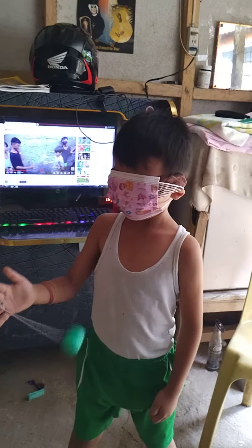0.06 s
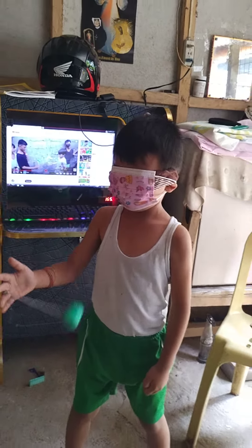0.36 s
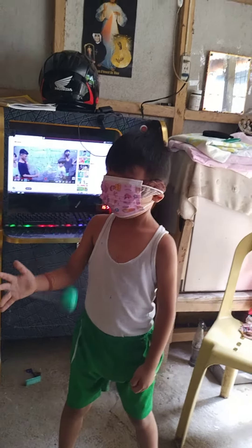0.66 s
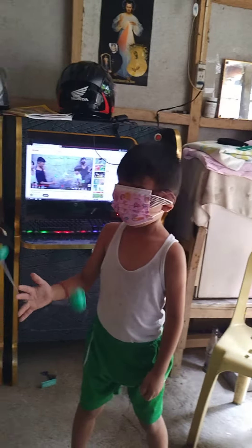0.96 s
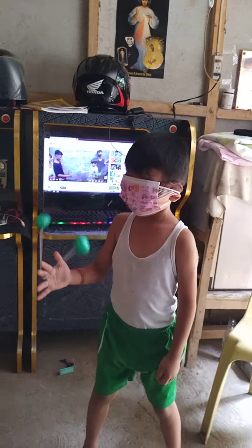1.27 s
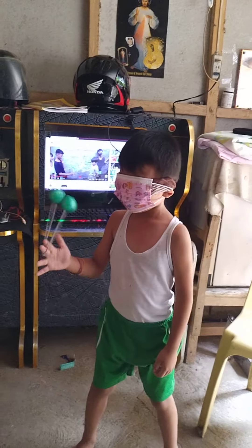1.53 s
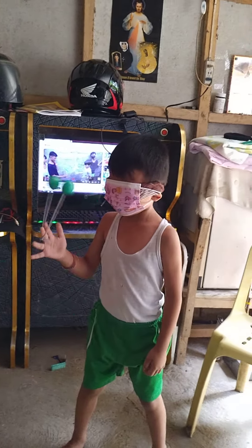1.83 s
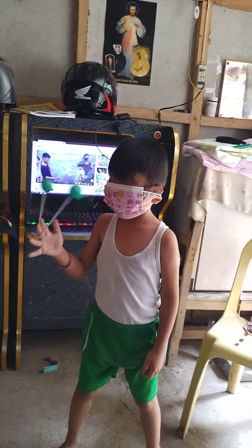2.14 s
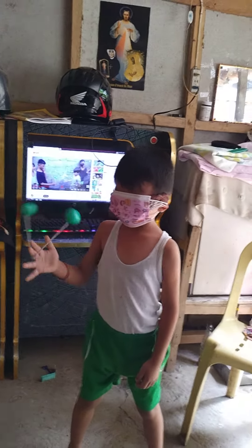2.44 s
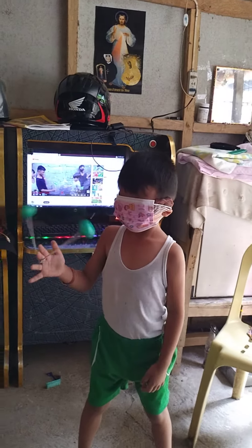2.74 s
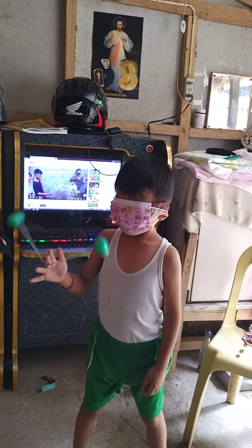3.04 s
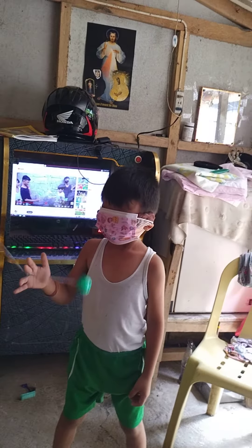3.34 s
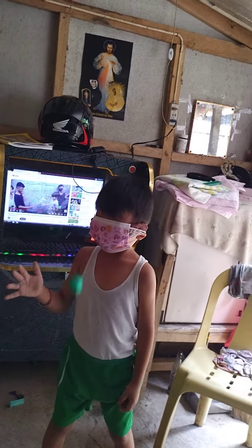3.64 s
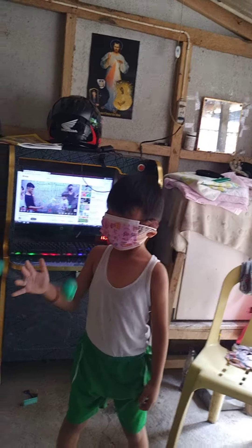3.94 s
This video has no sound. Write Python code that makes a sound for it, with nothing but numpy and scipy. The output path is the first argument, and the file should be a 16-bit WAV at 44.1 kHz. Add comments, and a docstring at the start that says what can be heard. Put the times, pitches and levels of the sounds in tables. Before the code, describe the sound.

Two hard plastic balls on strings clack together in a fast, even rhythm indoors.

```python
"""A small room in a house. Two hard plastic balls on strings clack together about 6.5 times a second,
in turn above and below the hand. Each contact is one very short pressure pulse that hardly rings;
near surfaces and the room give it body. The hardest clacks overload the microphone, adding a dull thump.
Underneath: faint room noise, weak hums and a few far-off whistling tones."""
import sys
import numpy as np
from scipy import signal
from scipy.fft import rfft, irfft, next_fast_len
from scipy.io import wavfile
from scipy.ndimage import map_coordinates

SR = 44100
rng = np.random.default_rng(int(sys.argv[2]) if len(sys.argv) > 2 else 0)


def file_out(sig):
    """Save sig as 16-bit WAV at sys.argv[1]."""
    # one column per channel
    cols = np.atleast_2d(sig).T
    # limit, then scale
    lim = np.clip(cols, -1, 1)
    pcm = np.round(lim * 32767).astype(np.int16)
    wavfile.write(sys.argv[1], SR, pcm)


N = 176400

# Ball contacts. Each row: start in seconds, left direct peak in dB, room send in dB, place (0 above the
# hand, 1 below), notch in Hz (higher for a harder, shorter contact), treble in dB, ping in dB.
CONTACTS = [(0.0275, -3.5, 7.4, 0, 8700, -1.7, 4), (0.1803, -2, 11.5, 1, 8900, -2, 4.5),
            (0.3435, -10, 8.4, 0, 8900, 0.64, 1.5), (.4920, -4.5, 11.3, 1, 9400, -1.6, 4),
            (0.6592, -8, 6.2, 0, 8200, -3.7, 8), (.8119, 1, 11.8, 1, 10600, 1, 2.5),
            (0.9717, -0.5, 8.6, 0, 10500, 1, 0.5), (1.1186, 3.5, 13.2, 1, 10900, 1, 4),
            (1.297, 1.5, 7.3, 0, 10270, -1.6, 3), (1.447, 8, 12.6, 1, 11150, -0.59, 6.5),
            (1.5970, 4, 8.4, 0, 10560, -0.37, 4), (1.7406, 6, 12.2, 1, 10330, -0.16, 6.5),
            (1.8966, 0.2, 8.1, 0, 10350, 0, 0.5), (2.0439, 7, 11.7, 1, 10600, -2.1, 7.5),
            (2.217, 0, 6.3, 0, 9400, -2.8, 4.5), (2.3718, 7.5, 12.3, 1, 10600, -2.6, 9),
            (2.5270, 0.5, 7, 0, 8900, -4.3, 3.5), (2.6687, 4, 11.2, 1, 9970, 1, 6),
            (2.8328, -1.4, 8.1, 0, 9500, 0.13, 3), (2.98, 0, 12.4, 1, 11200, 1, 5),
            (3.1469, -6, 8, 0, 9700, -0.23, 3), (3.2998, -4.5, 10.8, 1, 10900, -0.84, 1),
            (3.4630, -5.8, 7.6, 0, 8950, -1.8, 2), (3.6037, 1.8, 11.7, 1, 10650, 0.081, 1.5),
            (3.7677, -0.7, 6.7, 0, 10200, -0.31, 2.5), (3.9182, 6.5, 12.7, 1, 11100, 0.82, 4)]
# Spectra of the contact pulse and of the room's answer per place. Each row: frequency in Hz, gain in dB.
PULSE_SPECTRUM = [(100, -31), (700, -40.5), (1400, -18.5), (2800, -6), (4500, -1), (6500, -3.5),
                  (9000, -9.5), (12500, -7.5), (15000, -24), (16500, -23.5), (20000, -67)]
ROOM_SPECTRUM_ABOVE = [(100, -41.5), (500, -33.5), (900, -23), (1500, -17.5), (2300, -7), (3300, -3.5),
                       (4800, -1), (7000, -7.5), (10000, -6.5), (13400, -8.5), (14800, -38), (16500, -27)]
ROOM_SPECTRUM_BELOW = [(100, -35), (500, -29.5), (900, -24.5), (1500, -13), (2300, -6), (3500, 0.5),
                       (5000, 1.5), (7000, -2), (9500, -4), (13400, -3.5), (15000, -25), (16500, -40)]
# Stereo image per place. Each row: direct left over right in dB, right lag in ms,
# room left over right in dB.
STEREO_PLACES = [(2.3, -.035, 1.1), (3.2, 0.13, 1.04)]
# Near-surface echoes, one list per place. Each row: delay in ms, level in dB re the direct pulse.
REFLECTIONS = [
    [(.8, -12), (2.6, -18), (3.4, -9.5), (5.5, -10.5)],
    [(1.0, -18.5), (2.4, -11), (4.5, -24), (5.4, -21.5)],
]
# Room decay. Each row: frequency in Hz, T60 in seconds.
ROOM_DECAY = [(300, 0.13), (1500, 0.12), (4000, 0.13), (8000, 0.12), (14000, 0.13)]
# Room noise. Each row: frequency in Hz, relative level in dB.
HUSH_SPECTRUM = [(20, 11), (40, 9), (70, 6), (170, 7.5), (290, -3.5), (430, -7.5), (734, -9), (2480, -12),
                 (5000, -9.5), (8600, -14), (13000, -20.5), (15000, -38)]
# Room noise width. Each row: frequency in Hz, left-right correlation.
HUSH_CORRELATION = [(100, 0.88), (400, 0.77), (1500, 0.13), (6000, 0.16)]
# Far whistles. Each row: start in seconds, length in seconds, pitch in Hz, peak in dB.
WHISTLES = [(.56, 0.15, 1060, -70), (.90, .08, 1150, -72), (3.678, 0.08, 1800, -64),
            (3.714, .16, 1315, -58), (3.96, .12, 775, -58)]
# Narrow noise bands. Each row: centre in Hz, width in Hz, mean level in dB.
HUM_BANDS = [(200.3, 10, -71.5), (362, 20, -75.5), (494, 25, -80), (1393, 63, -86.5)]

HIT_SAMPLES = 16384
NOTCH_DB, NOTCH_WIDTH_HZ = -8.5, 1090
PING_HZ, PING_WIDTH_HZ, TREBLE_CORNER_HZ = 10180, 1500, 7000
REFLECTION_SCATTER_MS, ROOM_BUILD_MS, ROOM_TRIM_DB = 0.1307, 2.61, -0.56
HOUSE_DB, HOUSE_T60_S = -30.5, 0.38  # slower decay beyond the room
WHISTLE_WAVER, WHISTLE_RISE_PER_S = 0.0073, 0.27  # fractions of the pitch
HUSH_DB, HUSH_LEFT_DB, HUSH_WAVER_DB, HUSH_WAVER_PER_S = -60.5, 1, 1.9, 7
CLIP_LEVEL, BAND_LIMIT_HZ = 0.94, 16000


def clacking_balls():
    """Each contact pulse arrives directly, off near surfaces and through the room."""
    out = np.zeros((2, N + 2 * HIT_SAMPLES))
    base_spectrum = minimum_phase(PULSE_SPECTRUM)
    room_colours = [minimum_phase(ROOM_SPECTRUM_ABOVE), minimum_phase(ROOM_SPECTRUM_BELOW)]
    kept_samples = HIT_SAMPLES // 2
    for start_s, direct_db, send_db, place, notch_hz, treble_db, ping_db in CONTACTS:
        left_db, lag_ms, room_left_db = STEREO_PLACES[place]
        colour = contact_colour(notch_hz, treble_db, ping_db)
        pulse = base_spectrum * colour
        pulse /= np.abs(irfft(pulse)).max()
        direct = amp([[0], [-left_db]]) * delay([max(-lag_ms, 0), max(lag_ms, 0)])
        early = sum(amp(db) * delay(ms + REFLECTION_SCATTER_MS * rng.standard_normal(2))
                    for ms, db in REFLECTIONS[place])
        room = amp(send_db + ROOM_TRIM_DB) * pan(room_left_db) * room_tail(room_colours[place] * colour)
        clack = amp(direct_db) * irfft(pulse * (direct + early)) + room
        onset = round(start_s * SR)
        out[:, onset:onset + kept_samples] += clack[:, :kept_samples]
    return out[:, :N]


def contact_colour(notch_hz, treble_db, ping_db):
    """Contact length notches the spectrum; the balls' own resonance near 10 kHz adds a high ping of varying
    strength."""
    hz = np.linspace(0, SR / 2, 400)
    notch = NOTCH_DB * np.exp(-((hz - notch_hz) / NOTCH_WIDTH_HZ) ** 2)
    ping = ping_db * np.exp(-((hz - PING_HZ) / PING_WIDTH_HZ) ** 2)
    shelf = treble_db * (1 - 1 / (1 + (hz / TREBLE_CORNER_HZ) ** 4))
    return minimum_phase(np.column_stack([hz, notch + ping + shelf]))


def room_tail(colour):
    """Diffuse echoes, unit energy: quick build-up, short room decay, faint longer house decay."""
    hz, frame_s, noise = signal.stft(rng.standard_normal((2, HIT_SAMPLES)), SR, nperseg=128)
    room_fade = amp(-60 * frame_s / log_interp(ROOM_DECAY, hz)[:, None])
    house_fade = amp(HOUSE_DB - 60 * frame_s / HOUSE_T60_S)
    tail = signal.istft(noise * (room_fade + house_fade), SR, nperseg=128)[1][:, :HIT_SAMPLES]
    t_ms = np.arange(HIT_SAMPLES) * 1000 / SR
    build_up = 1 - np.exp(-(t_ms / ROOM_BUILD_MS) ** 2)
    tail = irfft(rfft(tail * build_up) * colour)
    return tail / np.linalg.norm(tail, axis=1, keepdims=True)


def far_whistles():
    """Thin tones that swell, rise slightly and fade."""
    out, t_s = np.zeros(N), np.arange(N) / SR
    for start_s, length_s, hz, db in WHISTLES:
        progress = np.clip((t_s - start_s) / length_s, 0, 1)
        rise = WHISTLE_RISE_PER_S * length_s * (progress - .5)
        pitch_hz = hz * (1 + rise + WHISTLE_WAVER * waver(knots_per_s=44))
        out += amp(db) * np.sin(np.pi * progress) * np.sin(2 * np.pi * np.cumsum(pitch_hz) / SR)
    return out


def room_noise():
    """Steady low hush, nearly mono in the bass."""
    hz = np.fft.rfftfreq(N, 1 / SR)
    spread_rad = np.arccos(log_interp(HUSH_CORRELATION, hz)) / 2
    spectrum = rfft(rng.standard_normal((2, N))) * amp(log_interp(HUSH_SPECTRUM, hz))
    mid, side = irfft(spectrum * [np.cos(spread_rad), np.sin(spread_rad)], N)
    stereo = np.array([mid + side, mid - side])
    return amp(HUSH_DB) * pan(HUSH_LEFT_DB) * stereo / stereo.std()


def hums():
    """Weak, unsteady hums: narrow bands of noise."""
    out, hz = np.zeros(N), np.fft.rfftfreq(N, 1 / SR)
    for centre_hz, width_hz, db in HUM_BANDS:
        passband = np.exp(-((hz - centre_hz) / width_hz) ** 2)
        band = irfft(rfft(rng.standard_normal(N)) * passband, N)
        out += amp(db) * band / band.std()
    return pan(HUSH_LEFT_DB) * out


def amp(db):
    """Decibels to gain."""
    return 10 ** (np.asarray(db) / 20)


def log_interp(points, hz):
    """Interpolate (Hz, value) points on a log frequency axis."""
    knots_hz, values = np.transpose(points)
    return np.interp(np.log(hz + 1), np.log(knots_hz + 1), values)


def minimum_phase(points):
    """Causal response with the given (Hz, dB) shape."""
    gain = amp(log_interp(points, np.fft.rfftfreq(HIT_SAMPLES, 1 / SR)))
    cepstrum = irfft(np.log(gain))
    cepstrum[1:HIT_SAMPLES // 2] *= 2
    cepstrum[HIT_SAMPLES // 2 + 1:] = 0
    return np.exp(rfft(cepstrum))


def delay(ms):
    """Frequency response of one delay per channel."""
    khz = np.fft.rfftfreq(HIT_SAMPLES, 1 / SR) / 1000
    return np.exp(-2j * np.pi * khz * np.reshape(ms, (-1, 1)))


def pan(left_db):
    """Left and right gains for a level difference."""
    return amp(np.array([[left_db], [-left_db]]) / 2)


def waver(knots_per_s):
    """Smooth random curve."""
    knots = rng.standard_normal(int(N * knots_per_s / SR) + 4)
    return map_coordinates(knots, [np.arange(N) * knots_per_s / SR])


def scene():
    """Clacks and far whistles over a slightly wavering background."""
    background = (room_noise() + hums()) * amp(HUSH_WAVER_DB * waver(HUSH_WAVER_PER_S))
    return clacking_balls() + far_whistles() + background


def record(dry):
    """Loudest clacks clip; treble above 16 kHz is cut steeply."""
    clipped = np.clip(dry, -CLIP_LEVEL, CLIP_LEVEL)
    size = next_fast_len(N + HIT_SAMPLES)
    low_pass = 1 / np.sqrt(1 + (np.fft.rfftfreq(size, 1 / SR) / BAND_LIMIT_HZ) ** 100)
    return irfft(rfft(clipped, size) * low_pass, size)[:, :N]


dry = scene()
out = record(dry)
file_out(out)
```